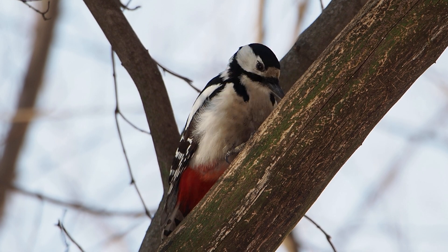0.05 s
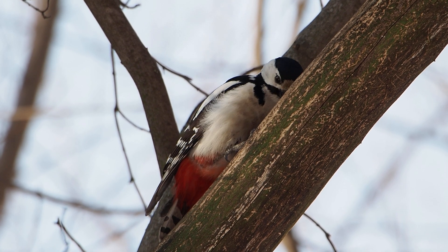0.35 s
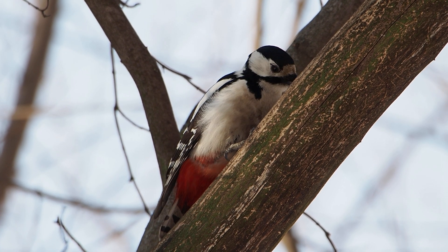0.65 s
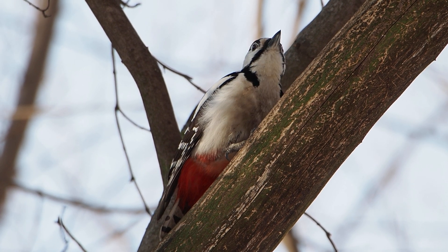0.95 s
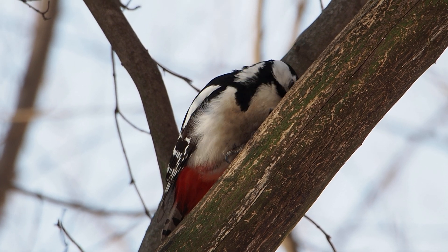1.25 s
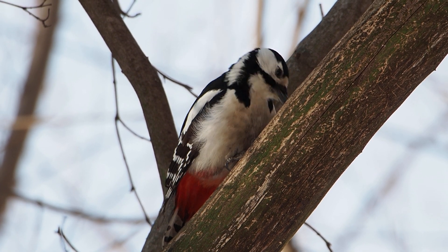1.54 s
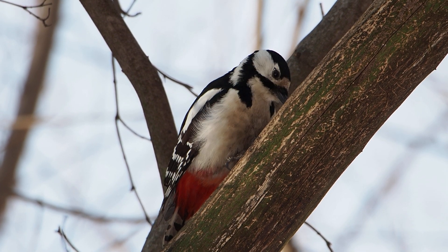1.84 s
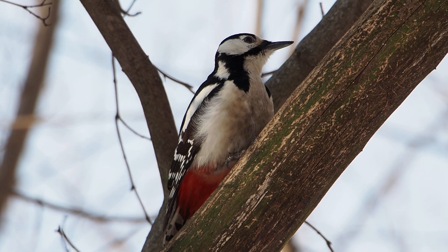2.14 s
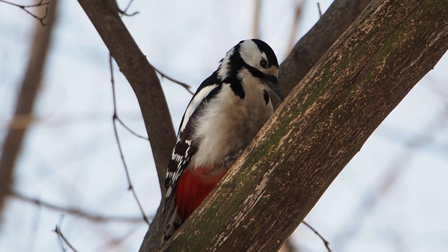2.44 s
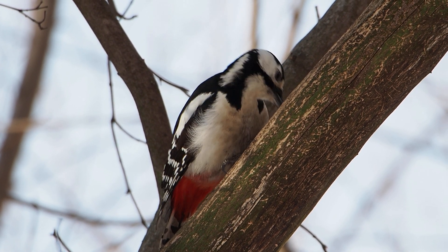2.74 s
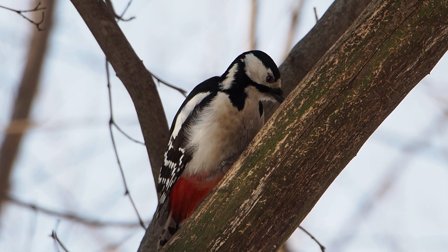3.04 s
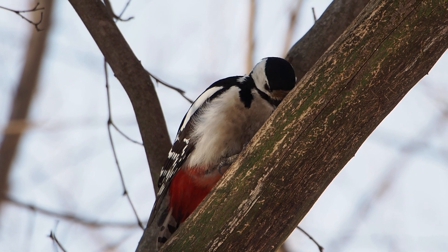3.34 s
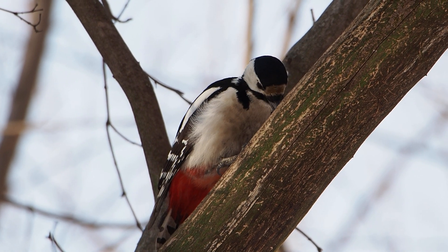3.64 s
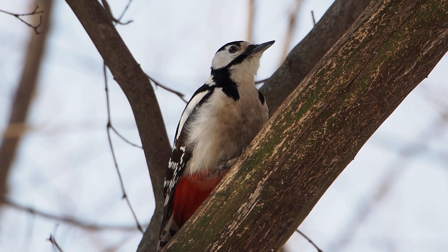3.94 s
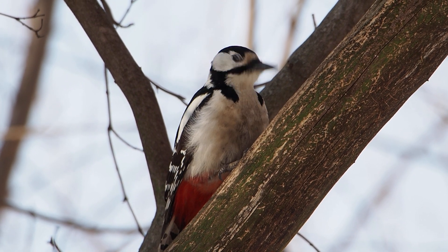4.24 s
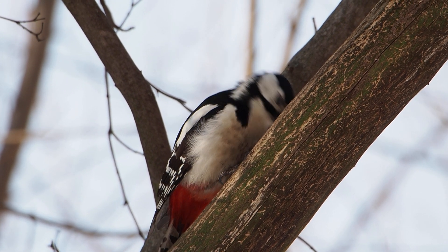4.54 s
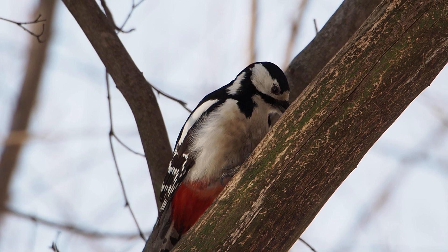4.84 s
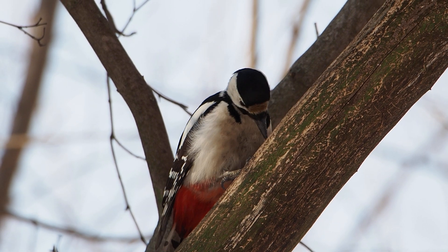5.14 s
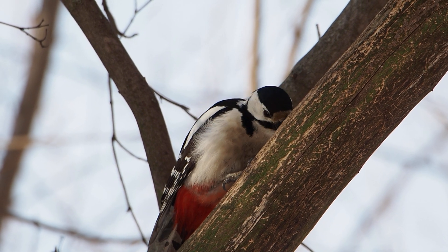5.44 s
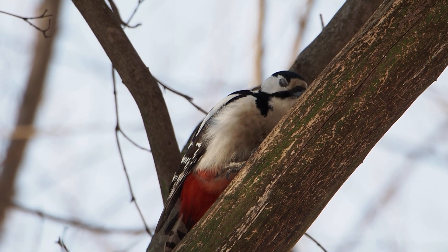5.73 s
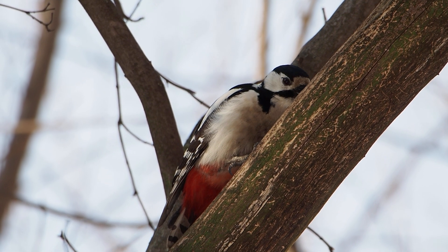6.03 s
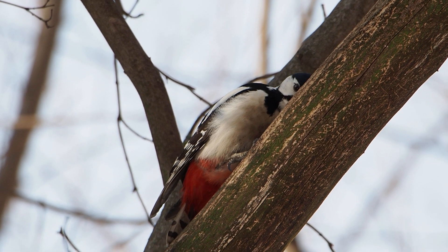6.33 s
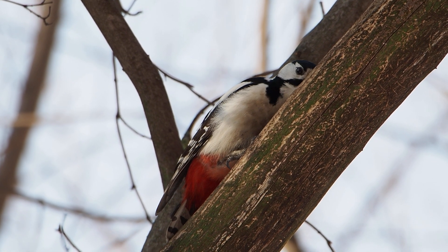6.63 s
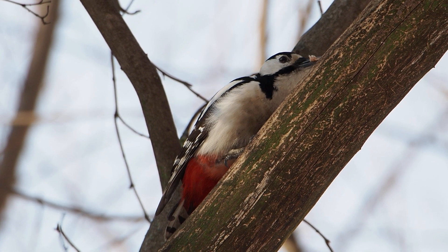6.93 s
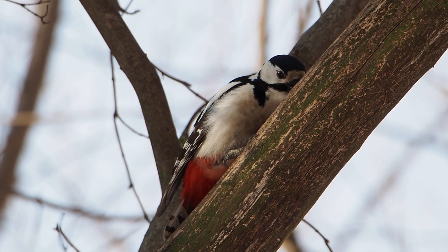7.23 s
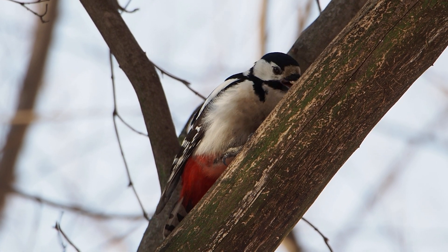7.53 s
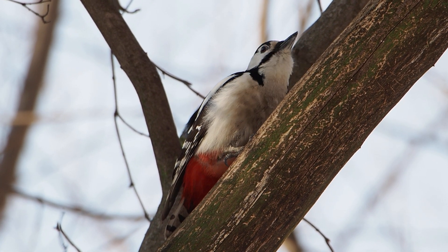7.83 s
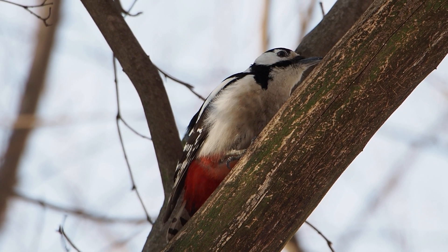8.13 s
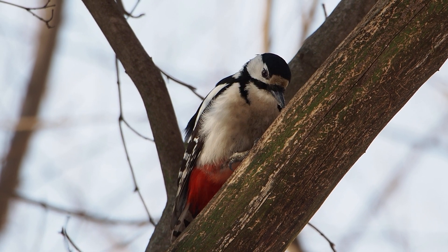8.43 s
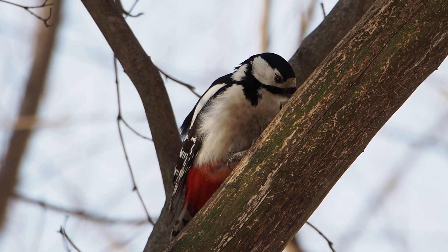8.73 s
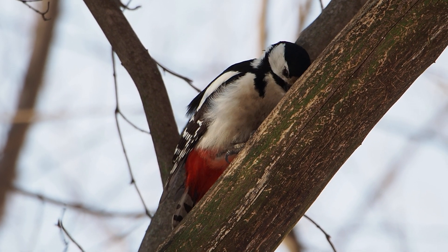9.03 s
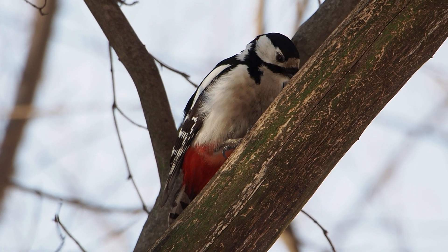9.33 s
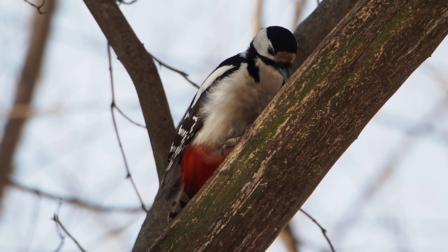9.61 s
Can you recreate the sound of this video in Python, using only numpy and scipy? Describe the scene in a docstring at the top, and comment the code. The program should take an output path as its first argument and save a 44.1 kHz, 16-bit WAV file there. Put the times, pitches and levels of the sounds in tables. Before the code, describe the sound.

Low wind rumbles on the microphone in a winter wood, mostly on the left, over a faint steady town hum. Small birds give short, thin, very high whistles throughout, with a slight echo among the trunks. A woodpecker pecks a branch with light, dry taps, twice around 1.5 seconds and three times between 2.5 and 2.9. Faint, hoarse falling cries come from far off at about 3.3 and 5.2 seconds. From 4.5 to 5.3 a small bird scolds in a quick buzzy chatter. From about 6.7 the wind grows into loud, irregular thumping buffets, hardest near 7.5, spreading somewhat to the right and lasting until the end at nearly 10 seconds. Beneath it are faint distant yelps around 7, a pair of two-part calls just before 8, and weaker chatter from 8.7. The clearest high whistles come at 6.4 and around 9.3 seconds.

```python
"""A winter wood, over the hum of a town. A woodpecker pecks at a branch, each blow exciting the damped
modes of bark and wood. Tits whistle in near-pure tones, and one scolds in a buzzy chatter from both
sides of its syrinx. Larger birds call far off, and the trunks scatter the sounds into echoes.
Turbulent wind buffets the left microphone, then grows and reaches both; its hardest thumps make
a limiter duck."""
import sys
import numpy as np
from scipy import signal
from scipy.fft import rfft, irfft
from scipy.io import wavfile
from scipy.ndimage import uniform_filter1d, minimum_filter1d, map_coordinates

SR = 44100
rng = np.random.default_rng(int(sys.argv[2]) if len(sys.argv) > 2 else 0)


def transcribe(u):
    """Save the signal u as a 16-bit wav file named by the first command-line argument.

    u: samples, shape (n,) or (channels, n), limited to [-1, 1]; the rate is SR.
    q: integer samples, one column per channel.
    """
    v = np.clip(np.atleast_2d(u).T, -1, 1)
    q = np.round(v * 32767).astype(np.int16)
    wavfile.write(sys.argv[1], SR, q)


N = 426447
TIME = np.arange(N) / SR

# Levels in the tables are relative: each layer has its own gain besides.
# Spectra of the noise sources. Each row: frequency in Hz, spectral level in dB.
HISS_SPECTRUM = [(500, 15), (2400, 6.5), (3400, 8), (4600, 4), (6000, -1.5), (7200, 5.5), (8800, 4.5),
                 (10500, 2), (12500, 4.5), (15500, 2.5)]
TOWN_SPECTRUM = [(15, 3), (55, -6.5), (120, 1), (220, 0.5), (400, -9.5), (750, -13), (1000, -17),
                 (1400, -26.5), (1700, -29), (2400, -48), (5000, -42)]
TURBULENCE_SPECTRUM = [(15, -24), (40, -9.5), (70, 1.5), (135, 1.5), (200, -3), (300, -14), (450, -22.5),
                       (700, -44.5), (1000, -68), (1600, -97), (3000, -106)]
CHURN_SPECTRUM = [(120, -1), (250, 1), (450, -4), (850, -15.5), (1300, -34.5), (2500, -61)]  # air churned up around a hard eddy
RUSTLE_SPECTRUM = [(1500, 4.5), (4400, -6.5), (6000, -6), (8000, 3.5), (10000, -8), (15000, -14)]
CRACK_SPECTRUM = [(200, 18), (1200, -1), (2400, -8), (5000, -11.5), (6100, -23), (9000, -22), (15000, -40)]  # bark cracking under the beak
# Stereo balance of the hiss. Each row: frequency in Hz, left minus right in dB.
HISS_PAN = [(3000, -0.5), (9500, 0), (12500, -7.5), (15500, -4)]
# Likeness of the hum in the two ports. Each row: frequency in Hz, correlation (capped at 1 in use).
TOWN_CORRELATION = [(60, 1.9), (300, 0.84), (700, 0.93), (1400, 0.39), (3000, -0.5)]
# Response of the microphone ports to wind and hum. Each row: frequency in Hz, gain in dB.
PORT_RESPONSE = [(250, 1), (310, -5), (380, 3), (480, 3.5), (560, -0.5), (680, 4)]

# The breeze at the exposed left and the sheltered right port. Each row: time in seconds, level in dB.
LEFT_BREEZE = [(0, -49), (2.6, -40), (3.35, -54.5), (5.3, -45), (6.3, -36), (6.85, -25), (7.15, -25.5),
               (7.31, -31.5), (7.65, -26), (8.0, -32), (8.45, -22.5), (9.67, -20.5)]
RIGHT_BREEZE = [(0, -53), (6.201, -51.5), (6.9, -40.5), (7.901, -44), (8.2, -39.5), (8.6, -32.5),
                (9.67, -31.5)]
# Gusts at the left port. Each row: time of the crest in seconds, length in seconds, level in dB.
LEFT_GUSTS = [(0.115, 0.48, -34.5), (0.93, 0.47, -41.5), (1.258, 0.099, -36), (1.592, 0.13, -32),
              (2.017, 0.38, -32.5), (2.463, 0.57, -27), (3.067, 0.38, -33), (3.938, 0.21, -41.5),
              (4.214, 0.29, -40), (4.517, 0.07, -30.5), (5.668, 0.25, -29), (6.05, 0.14, -27),
              (6.973, 0.48, -23.5), (7.484, 0.18, -22.5), (7.694, 0.1, -19.5), (8.291, 0.27, -23)]
# Hard eddies at the left port. Each row: time of the peak in seconds, level in dB.
HARD_EDDIES = [(6.688, -11), (6.79, -11.5), (6.921, -26), (6.937, -5), (6.974, -19.5), (7.125, -11.5),
               (7.4685, 3.4), (7.596, -8.5), (7.833, -8), (8.239, -12.5), (8.406, -20), (8.479, -17),
               (8.533, -7.5), (8.7, -4.5), (8.779, -11), (8.833, -9.5), (8.9, -7.5), (9.074, -9.5),
               (9.181, -7.5), (9.234, -12.5), (9.257, -10), (9.314, -35), (9.432, -6.5), (9.51, -5),
               (9.64, -5)]
# Reverberation among the trunks. Each row: frequency in Hz, time to decay by 60 dB in seconds.
REVERB_TIMES = [(500, 0.87), (1800, 1.46), (4000, 0.39), (8000, 0.41), (15000, .3)]

# Far mews. Each row: start in seconds, level in dB, starting pitch in Hz, drawl length in seconds.
FAR_MEWS = [(3.281, -58.5, 1916, .3), (5.245, -60, 1963, 0.45)]
# Far yelps. Each row: start in seconds, level in dB, pitch in Hz.
FAR_YELPS = [(4.66, -73, 1970), (4.801, -69, 1740), (6.67, -70, 1416), (6.801, -69, 1396),
             (6.945, -67.5, 1560), (7.085, -67.5, 1690), (7.209, -73, 1650), (9.379, -73, 1530)]
# Rustles of wings and bark. Each row: start and length in seconds, level in dB, left minus right in dB.
SWISHES = [(3.311, 0.12, -71.5, -12), (3.477, 0.04, -72, -10), (5.732, 0.079, -70.5, -10.5),
           (5.819, 0.078, -73, -11), (9.505, 0.042, -63, 0)]
# Tiny snaps of bark. Each row: start in seconds, peak level in dB, left minus right in dB.
BARK_SNAPS = [(2.1003, -60, -7), (4.875, -50, -2), (6.168, -52, 5), (9.111, -55, 6)]

# Thin contact notes of the tits. Each row: start and length in seconds, level in dB, pitch in Hz,
# slide in Hz, left minus right in dB.
CONTACT_NOTES = [(.088, 0.036, -64, 7580, -650, 0), (0.428, 0.071, -68, 7060, -120, 9),
                 (0.904, 0.11, -60, 7340, 200, -10), (1.485, 0.071, -71, 7400, 220, -4),
                 (1.703, .096, -66.5, 7430, 120, -9), (2.256, .12, -63.5, 7230, 4, -10),
                 (2.39, 0.082, -62.5, 7870, -480, -2), (2.52, 0.097, -63, 7620, -330, -1),
                 (2.695, 0.1, -59.5, 7750, -520, -1), (3.014, .087, -64.5, 7340, 44, -8),
                 (3.075, 0.048, -49.5, 7720, -450, -12), (3.62, .035, -67, 7900, -1150, 1),
                 (3.71, .12, -78, 7800, -450, -2), (4.407, 0.1, -68, 7140, 3.5, -7),
                 (4.488, .11, -56, 7500, -48, -17), (4.708, 0.095, -57.5, 7600, -63, -11),
                 (5.37, 0.125, -51.5, 7430, 130, -10), (6.419, 0.12, -44.5, 7540, -440, 5),
                 (6.695, 0.095, -69.5, 7100, -130, 1), (8.15, 0.089, -68.5, 7020, -28, -4),
                 (8.52, 0.086, -73, 7020, -62, 2), (8.641, 0.092, -73, 7800, -350, -4),
                 (9.306, 0.083, -37.5, 8210, -480, -3), (9.426, 0.086, -42.5, 7780, 129, -1)]
# An upward flick, then a held lower note. Each row: start in seconds, level in dB, held pitch in Hz.
TWO_PART_CALLS = [(7.702, -54, 4240), (7.904, -55.5, 4130)]
# Faint down-slurs of a small bird close by. Each row: start in seconds, level in dB, end pitch in Hz.
DOWN_SLURS = [(.5, -68, 5400), (.955, -68, 4620), (1.092, -68, 4970), (1.21, -65.5, 5250),
              (9.385, -69, 5500), (9.515, -69, 5400), (9.629, -61.5, 5500)]
# Syllables of the scolding tit. Each row: start in seconds, length in seconds, level in dB.
SCOLD_SYLLABLES = [(4.508, 0.038, -55.5), (4.56, 0.025, -52.5), (4.599, 0.048, -53), (4.65, 0.047, -54.5),
                   (4.698, 0.043, -55), (4.76, 0.032, -56), (4.864, 0.0324, -55.5), (4.91, 0.039, -55),
                   (4.957, 0.065, -54.5), (5.005, 0.051, -55), (5.078, 0.033, -48), (5.127, 0.052, -53),
                   (5.198, 0.047, -51), (5.23, 0.052, -52.5), (8.667, .05, -69), (8.745, 0.039, -72),
                   (8.86, 0.041, -73), (8.939, 0.035, -69), (9.057, 0.042, -66), (9.125, 0.03, -66),
                   (9.195, 0.034, -68), (9.265, 0.049, -64), (9.367, 0.047, -63), (9.53, 0.041, -62)]
# Steady resonances of its throat. Each row: centre in Hz, half-width in Hz, gain in dB.
STEADY_FORMANTS = [(1750, 1100, -5.5), (7740, 540, -21), (11100, 4400, -20)]
# As it scolds, the upper resonance sinks and the nasal one swells for a while.
# Each row: time in seconds, upper resonance in Hz, nasal gain in dB.
FORMANT_SHIFTS = [(4.7, 6150, -7), (4.87, 5100, -2), (5.01, 5130, -6), (5.08, 4940, 7), (5.22, 5801, 6),
                  (8.7, 4300, -8)]

# Modes of the bark. Each row: frequency in Hz, level in dB, time to decay by 60 dB in seconds.
BARK_MODES = [(1570, -7, 0.014), (2910, -11, 0.015), (4040, -11, .012), (4850, -17, .01)]
# Blows of the beak. Each row: start in seconds, tap level in dB, knock level in dB, ratio by which
# the bark's frequencies are scaled at that spot.
BEAK_BLOWS = [(1.433, -47, -62, 1), (1.6487, -54, -59, 0.96), (2.5288, -50, -61, 0.94),
              (2.7014, -42, -58, 1), (2.8563, -44, -50.5, 1.13)]


def gain_of(db):
    """Amplitude grows tenfold for every 20 dB."""
    return 10 ** (np.asarray(db) / 20)


def unit_rms(x):
    """Dividing by the rms gives a signal of unit power."""
    return x / np.sqrt(np.mean(x ** 2) + 1e-20)


def value_at(points, hz):
    """Interpolation on a log-frequency axis joins the points of a spectrum."""
    freqs, values = np.transpose(points)
    return np.interp(np.log(hz + 1), np.log(freqs), values)


def coloured(x, spectrum):
    """Filtering is multiplication in frequency, here by a spectrum in dB."""
    size = x.shape[-1]
    return irfft(rfft(x) * gain_of(value_at(spectrum, np.fft.rfftfreq(size, 1 / SR))), size)


def wander(size, per_s):
    """Interpolating per_s random values a second gives a smooth fluctuation of rms about 1."""
    position = np.arange(size) * per_s / SR
    knots = np.random.default_rng(rng.integers(1 << 30)).standard_normal(int(position[-1]) + 2)
    return map_coordinates(knots, [position], order=2, mode="nearest")


def add(mix, start, sound, pan_db=0):
    """Sounds superpose; a level difference, left minus right, gives each its direction."""
    sides = gain_of([[pan_db / 2], [-pan_db / 2]])
    part = mix[:, round(start * SR):][:, :len(sound)]
    part += sides / sides.mean() * sound[:part.shape[1]]


def microphone_hiss():
    """Self-noise is steady and independent in each microphone, a little brighter on the right."""
    lean_db = value_at(HISS_PAN, np.fft.rfftfreq(N, 1 / SR)) / 2
    pair = irfft(rfft(rng.standard_normal((2, N))) * gain_of([lean_db, -lean_db]), N)
    return unit_rms(coloured(pair, HISS_SPECTRUM))


def town_hum():
    """Far traffic sums to an almost level noise, coherent between the two ports in the bass."""
    left, independent = rfft(rng.standard_normal((2, N)))
    correlation = np.clip(value_at(TOWN_CORRELATION, np.fft.rfftfreq(N, 1 / SR)), -1, 1)
    right = correlation * left + np.sqrt(1 - correlation ** 2) * independent
    hum = coloured(irfft([left, right], N), TOWN_SPECTRUM)
    drift = gain_of(0.2 * wander(N, per_s=3.5))
    return drift * unit_rms(coloured(hum, PORT_RESPONSE))


def with_gusts(breeze_db):
    """Incoherent powers add: each gust, a large slow eddy, lays a smooth swell on the breeze's level."""
    power = gain_of(breeze_db) ** 2
    for crest, length, db in LEFT_GUSTS:
        swell = np.cos(np.pi * np.clip((TIME - crest) / length, -.5, .5))
        power += (gain_of(db) * swell) ** 2
    return 10 * np.log10(power)


def buffet(level_db, flow_db, eddy_db, eddies_per_s, quickening):
    """Turbulence is convected past a port: faster air sounds both louder and higher."""
    eddies = np.tanh(wander(N, eddies_per_s) / 2)
    speed = gain_of(quickening * np.clip(flow_db + 19, -22, 8)) * 1.6 ** eddies
    field = unit_rms(coloured(rng.standard_normal(N), TURBULENCE_SPECTRUM))
    pressure = map_coordinates(field, [np.cumsum(speed)], order=3, mode="wrap")
    return gain_of(level_db + eddy_db * eddies) * pressure


def vortex(t, hz):
    """Pressure is low in a vortex core, so its passage is a sharp dip, deepest at t = 0."""
    u = (2 * np.pi * hz * t) ** 2
    return (u - 1) / (1 + u) ** 2


def thumps(hz=142.5, core_share=0.54, wake_s=0.0059, churn_s=0.0056):
    """A hard eddy is a vortex core amid softer swings of pressure and a puff of churned air."""
    out = np.zeros((2, N))
    t = np.arange(-SR // 20, SR // 20) / SR
    wake = -np.cos(2 * np.pi * hz * t) * np.exp(-abs(t) / wake_s)
    eddy = core_share * vortex(t, hz) + (1 - core_share) * wake
    for peak, db in HARD_EDDIES:
        churn = unit_rms(coloured(rng.standard_normal(len(t)), CHURN_SPECTRUM))
        puff = gain_of(-15) * churn * np.exp(-(t / churn_s) ** 2)
        add(out, peak + t[0], gain_of(db) * (eddy + puff))
    return out[0]


def small_eddies(breeze_db, per_s=70, hz=165):
    """Small vortices arrive as a Poisson process, their strength following the breeze."""
    arrivals = rng.random(N) < per_s / SR
    strengths = arrivals * rng.random(N) * gain_of(breeze_db + 0.5)
    return signal.fftconvolve(strengths, vortex(TIME - TIME.mean(), hz), "same")


def wind(gust_push=0.4):
    """Turbulent pressure is local: each port has its own; gusts and vortices strike only the left."""
    breeze_db = np.interp(TIME, *np.transpose(LEFT_BREEZE))
    right_db = np.interp(TIME, *np.transpose(RIGHT_BREEZE))
    left_db = with_gusts(breeze_db)
    flow_db = breeze_db + gust_push * (left_db - breeze_db)  # part of each gust also quickens the air
    left = gain_of(5.5) * buffet(left_db, flow_db, eddy_db=7.5, eddies_per_s=70, quickening=.25)
    right = gain_of(3.5) * buffet(right_db, right_db, eddy_db=6, eddies_per_s=45, quickening=.3)
    left = left + thumps() + small_eddies(breeze_db)
    return coloured(np.array([left, right]) * signal.windows.tukey(N, .002), PORT_RESPONSE)


def trunk_echo(sound, build_s, echoes_per_s=2500):
    """Scattering by the trunks gives sparse echoes that build up, then decay band by band."""
    taps = rng.standard_normal((2, SR)) * (rng.random((2, SR)) < echoes_per_s / SR)
    hz, t, bands = signal.stft(taps, SR, nperseg=256)
    decay = gain_of(-60 * t / value_at(REVERB_TIMES, hz)[:, None])
    build = 1 - np.exp(-t / build_s)
    tail = signal.istft(bands * decay * build, SR, nperseg=256)[1]
    tail /= np.sqrt(np.mean(abs(rfft(tail)[:, 1000:8000]) ** 2))  # unit gain over about 1-8 kHz
    blended = (sound + sound.mean(0)) / 2
    return signal.fftconvolve(blended, tail, axes=1)[:, :N]


def at_echo_level(calls, level_db, falloff, middling_db=-60):
    """Reverberation weakens with distance by only a share, falloff, of the direct sound's loss in dB."""
    rows = np.array(calls)
    rows[:, 2] = level_db + falloff * (rows[:, 2] - middling_db)
    return rows


def whistles(notes, scoop_s, waver, waver_per_s, flutter_db, taper):
    """Near-pure tones scoop to a pitch, then slide; random frequency modulation roughens them.
    Each note: start and length in seconds, level in dB, first, main and last pitch in Hz, pan in dB."""
    out = np.zeros((2, N))
    for start, length, db, first_hz, main_hz, last_hz, pan_db in notes:
        size = int(length * SR)
        t = np.arange(size) / SR
        scoop = (first_hz - main_hz) * np.exp(-t / scoop_s)
        slide = (last_hz - main_hz) * (t / length) ** 1.584
        hz = (main_hz + scoop + slide) * (1 + waver * wander(size, waver_per_s))
        phase = 2 * np.pi * np.cumsum(hz) / SR
        tone = np.sin(phase) + gain_of(-30) * np.sin(2 * phase)
        swell = np.sqrt(abs(signal.windows.tukey(size, taper)))
        flutter = gain_of(flutter_db * wander(size, 117.4))
        add(out, start, gain_of(db) * unit_rms(swell * flutter * tone), pan_db)
    return out


def far_mews(cry_s=.17, overlap_s=.03, cry_fall_hz=198.5, drawl_fall_hz=89.5):
    """Fast frequency modulation makes a hoarse, falling cry that trails off in a lower drawl."""
    notes = []
    for start, db, hz, drawl_s in FAR_MEWS:
        low_hz = hz - cry_fall_hz
        drawl_start = start + cry_s - overlap_s
        notes.append((start, cry_s, db, hz, hz, low_hz, -11))
        notes.append((drawl_start, drawl_s, db - 3, low_hz, low_hz, low_hz - drawl_fall_hz, -4))
    return whistles(notes, scoop_s=.02, waver=.12, waver_per_s=1100, flutter_db=4, taper=.4)


def far_yelps(length_s=0.037, scoop_hz=212):
    """Each yelp is an exponential glide up to its pitch, heard from straight ahead."""
    notes = [(start, length_s, db, hz - scoop_hz, hz, hz, 0) for start, db, hz in FAR_YELPS]
    return whistles(notes, scoop_s=0.0092, waver=0.083, waver_per_s=780, flutter_db=1, taper=0.49)


def rustling(snap_s=.001):
    """Wings and bark swish as amplitude-modulated noise; tiny snaps are bright, fast-decaying bursts."""
    out = np.zeros((2, N))
    for start, length, db, pan_db in SWISHES:
        size = int(length * SR)
        grains = coloured(wander(size, SR), RUSTLE_SPECTRUM) * gain_of(1.8 * wander(size, 490))
        add(out, start, gain_of(db) * unit_rms(grains * signal.windows.tukey(size, .6)), pan_db)
    t = np.arange(SR // 100) / SR
    for start, db, pan_db in BARK_SNAPS:
        snap = np.gradient(rng.standard_normal(len(t))) * np.exp(-t / snap_s)
        add(out, start, gain_of(db) * snap / abs(snap).max(), pan_db)
    return out


def tit_whistles(scoop_depth=0.55, full_voice_db=-36.5, flick_s=.027, held_s=0.072, slur_s=0.056):
    """Gliding, almost sinusoidal calls: returns the direct sound and the part sent to the trunks."""
    notes = []
    for start, length, db, hz, slide_hz, pan_db in CONTACT_NOTES:
        scoop = scoop_depth * min(gain_of(db - full_voice_db), 1)  # louder notes start further below
        notes.append((start, length, db, hz * (1 - scoop), hz, hz + slide_hz, pan_db))
    for start, db, hz in TWO_PART_CALLS:
        notes.append((start, flick_s, db - 9.5, 4100, 5575, 7050, -6))
        notes.append((start + flick_s, held_s, db, hz - 520, hz, hz - 69.5, -6))
    # the close bird's down-slurs are heard dry, without echo
    slurs = [(start, slur_s, db, 6250, 6250, end_hz, 9) for start, db, end_hz in DOWN_SLURS]
    direct = whistles(notes + slurs, scoop_s=.0058, waver=.0059, waver_per_s=281, flutter_db=2.5, taper=.6)
    echoed = at_echo_level(notes, level_db=-62, falloff=0.4)
    return direct, whistles(echoed, scoop_s=.006, waver=.014, waver_per_s=400, flutter_db=2, taper=.4)


def throat_filter(source, time_s):
    """The throat's resonances shape the source into formants, with a valley between the two lowest."""
    times, upper_hz, nasal_db = np.transpose(FORMANT_SHIFTS)
    nasal = (3410, 450, np.interp(time_s, times, nasal_db))
    upper = (np.interp(time_s, times, upper_hz), 1000, 0)
    formants = STEADY_FORMANTS + [nasal, upper]
    hz = np.fft.rfftfreq(len(source), 1 / SR)
    response = sum(gain_of(db) / (1 + ((hz - centre) / width) ** 2) for centre, width, db in formants)
    valley = 1 - 0.8 * np.exp(-((hz - 2450) / 400) ** 2)
    return irfft(rfft(source) * response * valley, len(source))


def tit_scolding(syllables, mean_hz=851, rise=.11, arch=.21, jitter=.023, roughness=.45):
    """Biphonation: the two sides of the syrinx buzz at unrelated pitches, arching upward together."""
    out = np.zeros((2, N))
    harmonics = np.arange(2, 15)[:, None]
    for start, length, db in syllables:
        size = int(length * SR)
        u = np.linspace(-1, 1, size)
        pitch_hz = mean_hz * (1 + 0.0444 * rng.uniform(-0.99, 1))
        lean, bend = 1 + 0.55 * rng.uniform(-1.027, 1, 2)
        contour_hz = pitch_hz * (1 + lean * rise * u - bend * arch * u ** 2)
        sides_hz = [contour_hz * (1 + jitter * wander(size, 281)) for _ in range(2)]
        low_phase, high_phase = 2 * np.pi * np.cumsum(sides_hz, axis=1) / SR
        high_phase *= 1.2 * rng.uniform(.9, 1.1)
        buzz = np.cos(harmonics * low_phase) + gain_of(-5) * np.cos(harmonics * high_phase)
        puffs = unit_rms(wander(size, SR) * (1 + np.cos(low_phase)))  # noise pulsed once a cycle
        voice = throat_filter(unit_rms(buzz.sum(0)) + roughness * puffs, start)
        rasp = gain_of(2 * wander(size, 600))
        swell = signal.windows.tukey(size, .75)
        add(out, start, gain_of(db) * unit_rms(voice * rasp * swell), pan_db=1)
    return out


def woodpecker(crack_s=0.0051, attack_s=0.00043, knock_hz=917, knock_t60_s=0.089):
    """An impact excites damped modes: the bark cracks and rings dryly, the branch knocks hollowly."""
    out = np.zeros((2, N))
    t = np.arange(SR // 8) / SR
    knock = gain_of(-60 * t / knock_t60_s) * np.sin(2 * np.pi * knock_hz * t)
    for start, tap_db, knock_db, ratio in BEAK_BLOWS:
        ring = sum(gain_of(db - 60 * t / t60) * np.sin(2 * np.pi * hz * ratio * t)
                   for hz, db, t60 in BARK_MODES)
        crack = coloured(rng.standard_normal(len(t)), CRACK_SPECTRUM) * np.exp(-t / crack_s)
        tap = (crack / abs(crack).max() + ring) * (1 - np.exp(-t / attack_s))
        add(out, start, gain_of(tap_db) * tap + gain_of(knock_db) * knock, pan_db=-2.5)
    return out


def scene():
    """Direct sound, reverberation and background superpose; the far birds' echo builds more slowly."""
    tits, tits_scattered = tit_whistles()
    scolds = gain_of(-2.5) * tit_scolding(SCOLD_SYLLABLES)
    scolds_scattered = tit_scolding(at_echo_level(SCOLD_SYLLABLES, level_db=-64, falloff=0.99))
    pecks = gain_of(12.5) * woodpecker()
    mews = gain_of(0.5) * far_mews()
    yelps = gain_of(11) * far_yelps()
    rustles = gain_of(9.5) * rustling()
    direct = gain_of(-3.5) * (tits + mews) + scolds + pecks + rustles + yelps
    scattered = tits_scattered + scolds_scattered + gain_of(-9) * pecks + gain_of(-5.5) * rustles
    near_echo = trunk_echo(scattered, build_s=0.0017)
    far_echo = trunk_echo(gain_of(-2.5) * mews + gain_of(-21) * yelps, build_s=0.048)
    background = wind() + gain_of(-43) * town_hum() + gain_of(-59) * microphone_hiss()
    return direct + near_echo + far_echo + background


def record(dry):
    """Look-ahead limiting ducks the hardest thumps and recovers slowly; soft clip and low-pass follow."""
    ceiling_db, range_db, recovery_db_per_s, cutoff_hz = -1, 4.2, 7, 15800
    peak_db = 20 * np.log10(abs(dry).max(0) + 1e-9)
    over_db = np.clip(peak_db - ceiling_db, 0, range_db)
    ahead_db = -minimum_filter1d(-over_db, size=700)
    recovery_db = recovery_db_per_s * TIME
    duck_db = np.maximum.accumulate(ahead_db + recovery_db) - recovery_db
    limited = dry / gain_of(uniform_filter1d(duck_db, size=500))
    rounded = limited / (1 + limited ** 8) ** (1 / 8)
    low_pass = signal.firwin(1023, cutoff_hz, window=("kaiser", 9), fs=SR)
    return signal.oaconvolve(rounded, low_pass[None], "same")


dry = scene()
out = record(dry)
transcribe(out)
```